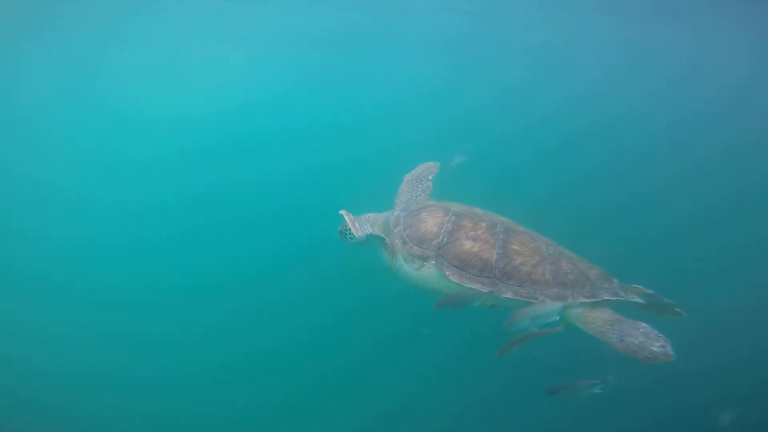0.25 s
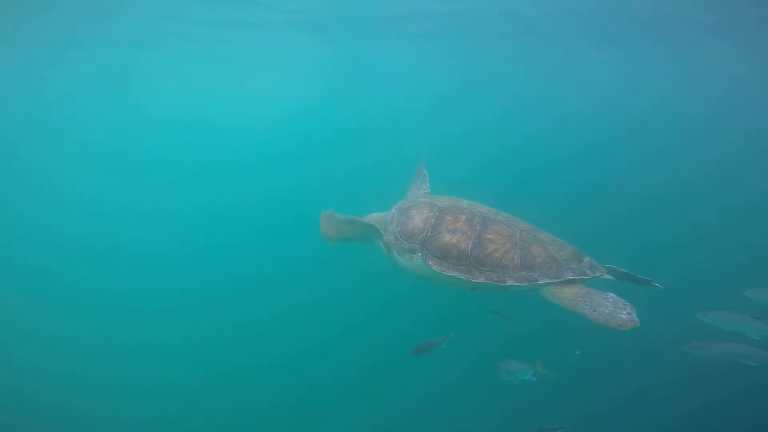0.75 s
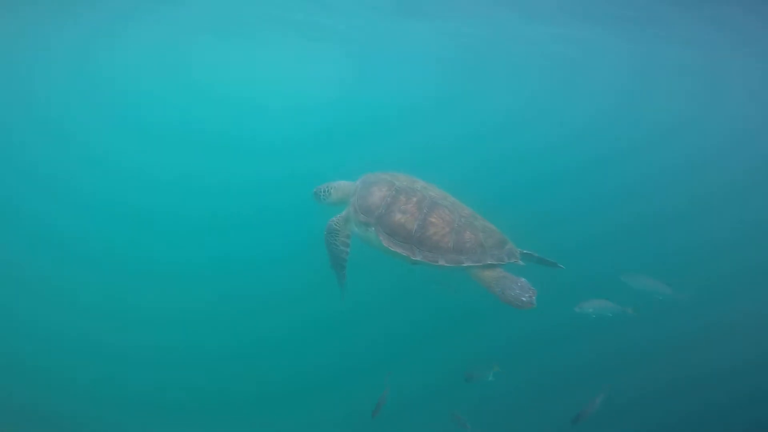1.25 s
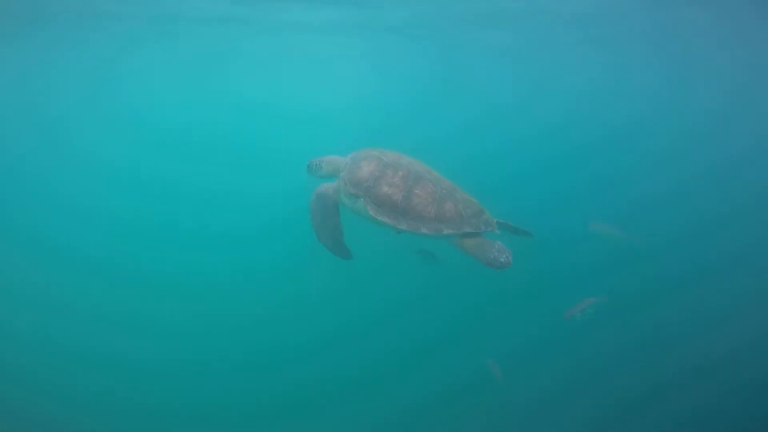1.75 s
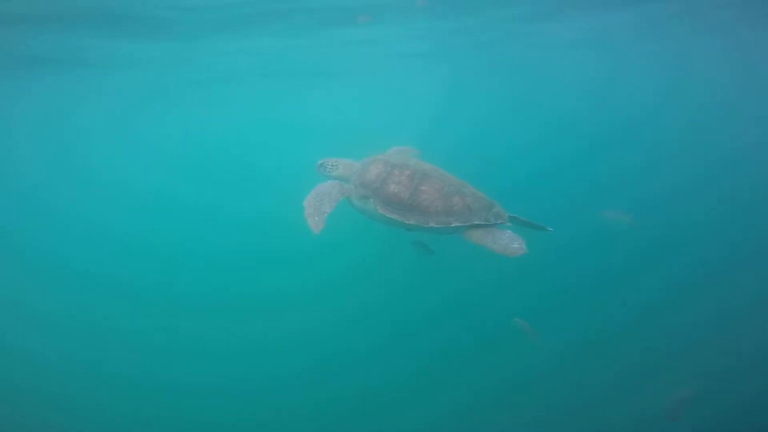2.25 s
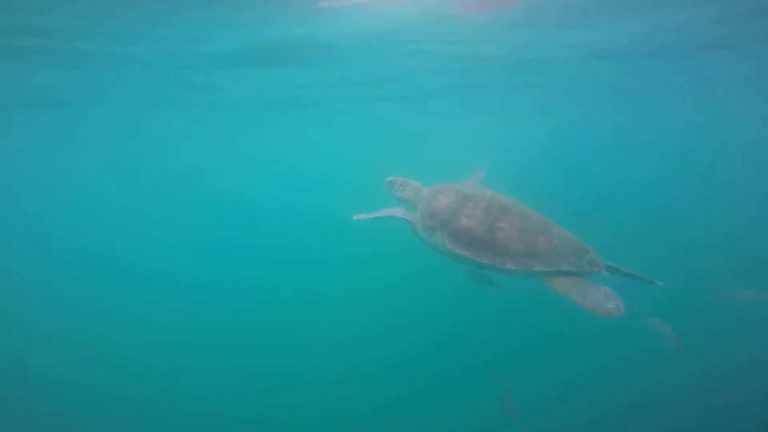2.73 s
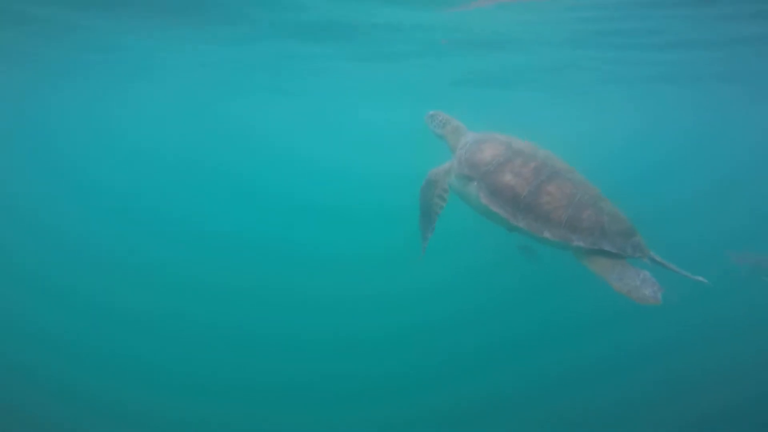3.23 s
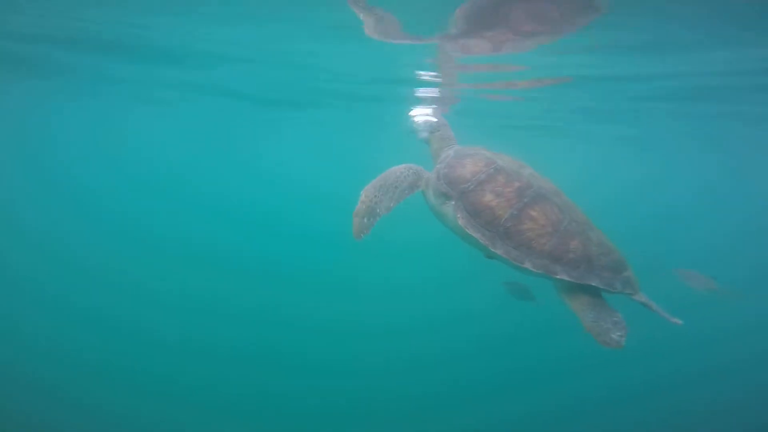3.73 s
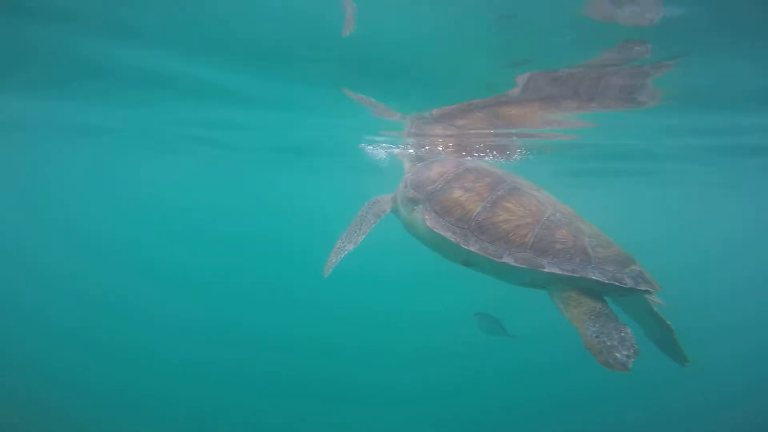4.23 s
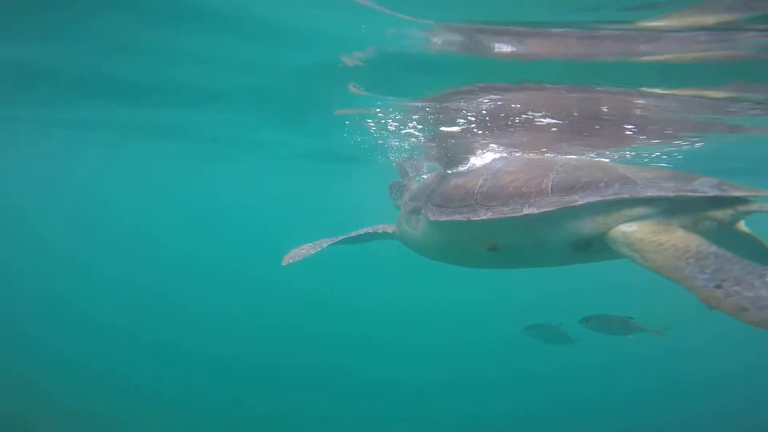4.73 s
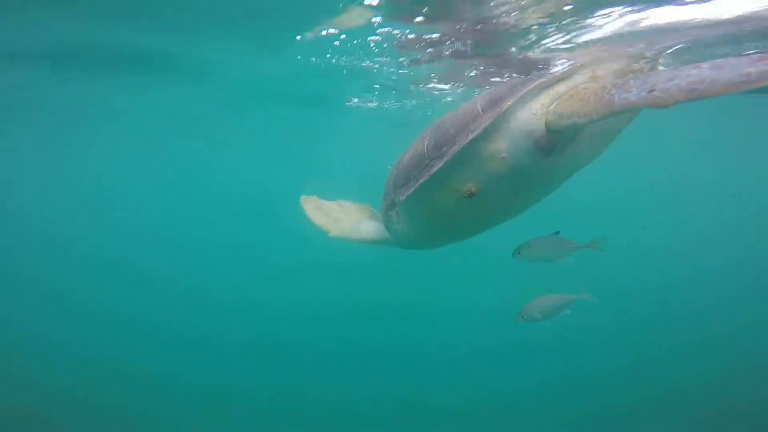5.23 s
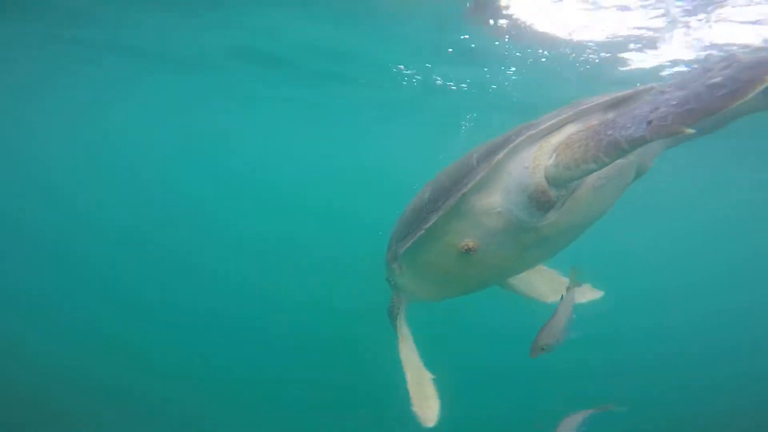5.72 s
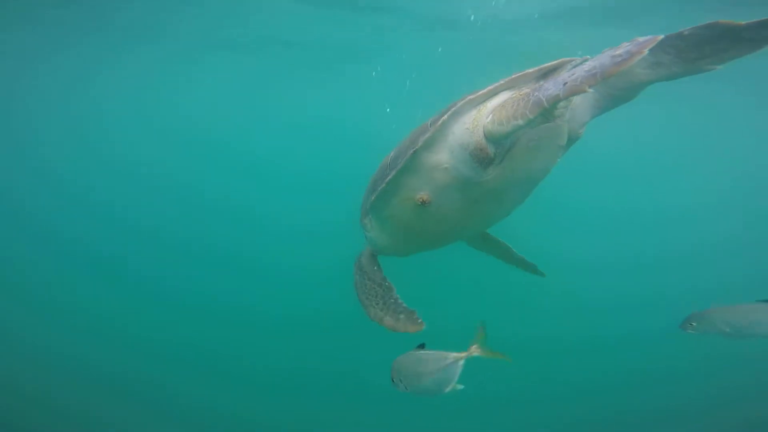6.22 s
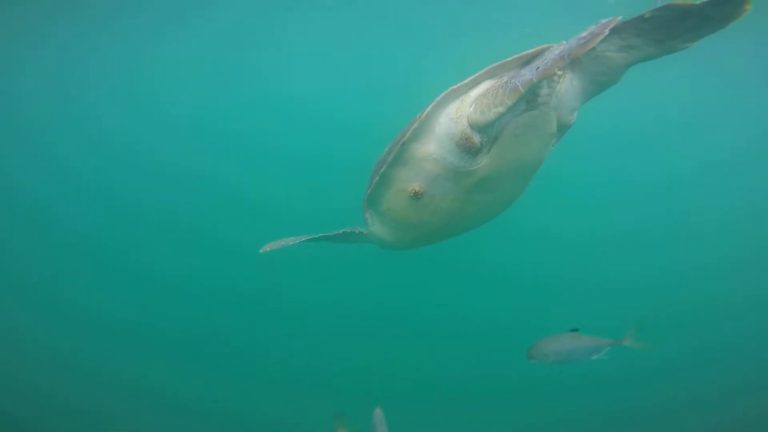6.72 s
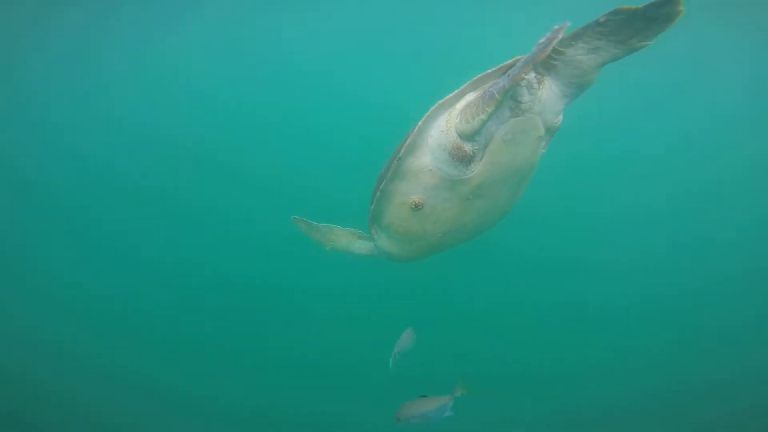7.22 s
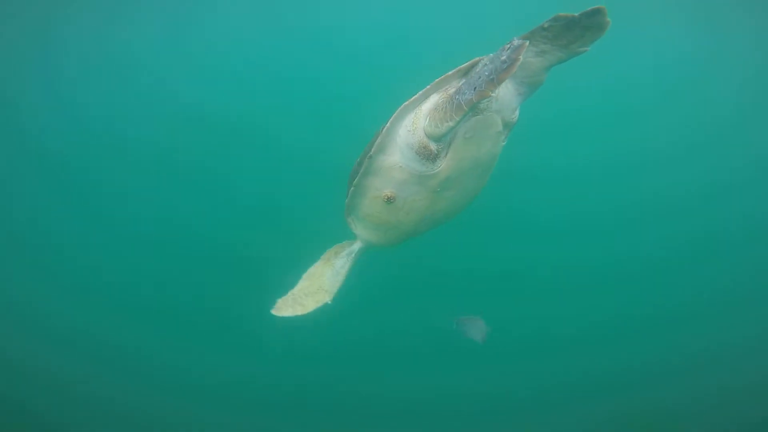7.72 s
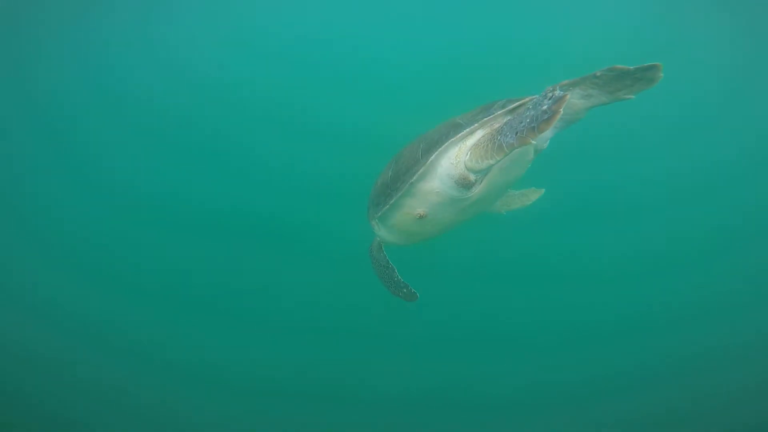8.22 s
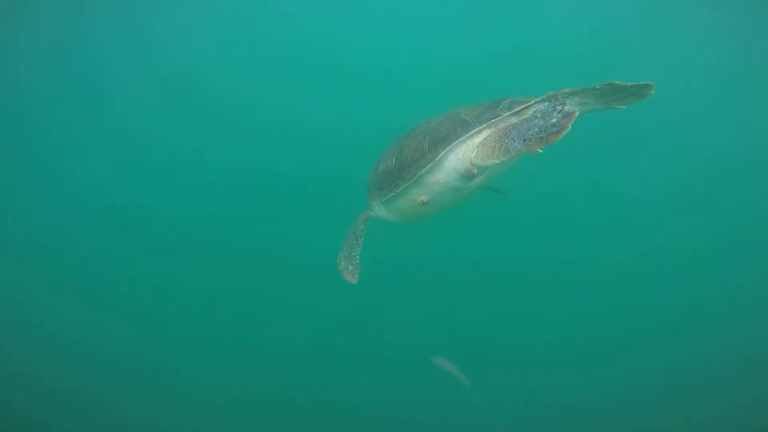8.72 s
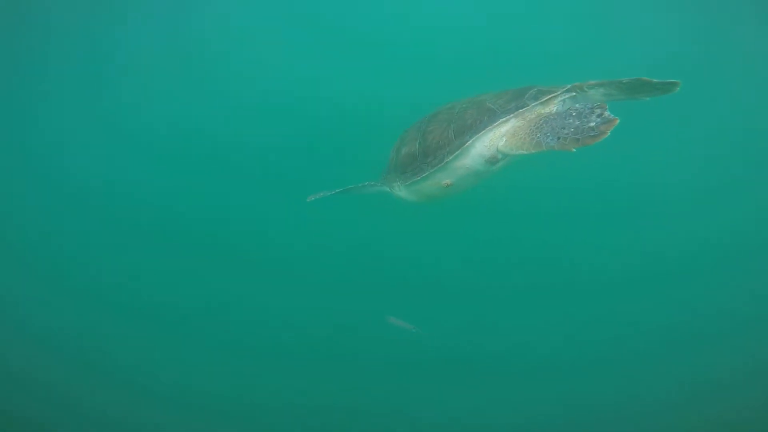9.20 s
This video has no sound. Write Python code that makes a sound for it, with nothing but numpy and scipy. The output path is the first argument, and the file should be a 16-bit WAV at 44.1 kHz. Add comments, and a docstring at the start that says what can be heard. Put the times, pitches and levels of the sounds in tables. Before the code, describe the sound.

A muffled engine drone pulses rapidly through open water, coloured by a faint mechanical whine. Tiny dry snaps and a hissy crackle surround it. Dull thumps, falling gulps and light slaps hit the microphone's housing, busiest around the middle near the surface. Afterward the throb becomes fuller and knockier, with small bubble plips and a last cluster of bumps. The swimming turtle is not heard.

```python
"""Open water just below the surface: an idling boat engine some way off gives a throbbing drone and a thin whine.
Its firings excite hull and machinery as bursts of noise, shaped by spectra that change as the microphone
drifts up to the surface and down again. Water and fingers bump the microphone's housing: falling gulps, slaps and
ringing modes. Eddies rumble past, a few bubbles plip as decaying sines, and shrimp snap as sharp noise pulses,
the near ones singly, the far ones merged into a crackle and a wash."""
import sys
import numpy as np
from scipy import signal
from scipy.fft import rfft, irfft, next_fast_len
from scipy.io import wavfile
from scipy.ndimage import uniform_filter1d, map_coordinates

SR = 44100
rng = np.random.default_rng(int(sys.argv[2]) if len(sys.argv) > 2 else 0)


def transcribe(signal):
    """Save signal, clipped to [-1, 1], as a 16-bit WAV file at the path in sys.argv[1]."""
    frames = np.atleast_2d(signal).T
    limited = np.clip(frames, -1, 1)
    pcm = np.round(limited * 32767).astype(np.int16)
    wavfile.write(sys.argv[1], SR, pcm)


N = 417181

# Path of the microphone: (time [s], place [0 open water, 1 at the surface, 2 on the dive])
DRIFT = [(0, 0.28), (.7, 0.00017), (2, 0.28), (2.6, 0.18), (3.5, 0.74), (4, 0.91), (5.5, 1.094),
         (6.05, 1.25), (6.45, 1.82), (9.46, 1.95)]

# Cylinder firings in one engine cycle: (phase [cycles], drone burst [dB], whine burst [dB])
FIRINGS = [(0.098, -4.5, 3), (0.372, -10.5, -4.5), (0.61, -0.5, 1.5), (0.86, -2, 2)]
IDLE_HZ, CREEP_HZ_PER_S = 14.585, .0048  # engine cycle rate at the start, and its rise
HUM_ORDER, HUM_LEVEL_DB = 24, -25  # multiple of the cycle rate; mean level against the drone
# Hull drone spectrum at each place, relative: (frequency [Hz], level [dB])
DRONE_OPEN = [(160, -19), (280, -19.5), (317, -17.5), (348, -14), (434, -8), (471, -16), (521, -2.5),
              (579, 3), (676, 4), (708, -5.5), (831, -2), (1010, -15), (1150, -20.5), (1500, -11),
              (2530, -120)]
DRONE_SURFACE = [(160, -21), (280, -32), (351, -18), (388, -16.5), (491, -16), (540, -12), (576, -8.5),
                 (626, 5), (730, -4), (850, -17), (935, -14.5), (1070, -22.5), (1150, -39), (1500, -67),
                 (2530, -120)]
DRONE_DIVE = [(160, -28.5), (280, -33.5), (340, -20), (376, -17), (414, -13), (559, -15), (615, -3.5),
              (680, 3.5), (792, -10), (876, -9.5), (941, -32.5), (1010, -17), (1100, -35.5), (1150, -24.5),
              (1500, -28.5), (2530, -120)]
# Machinery whine spectrum at each place, relative: (frequency [Hz], level [dB])
WHINE_OPEN = [(650, -37), (1100, -17), (1150, -14), (1290, -13), (1350, -5), (1530, -13), (1790, 0.5),
              (1980, -8.5), (2200, 3), (2420, -1), (2690, -5.5), (2910, 3), (3020, 2.5), (3180, -20),
              (3400, -13), (4420, -21.5), (7480, -120)]
WHINE_SURFACE = [(650, -49), (1100, -18), (1190, 1), (1470, -17), (1580, -14.5), (1830, -10), (2120, -0.5),
                 (2280, 2.5), (2390, 2), (2570, 1), (2830, -4), (2990, 1.5), (3040, -21), (3320, -15),
                 (3400, -16), (4420, -41), (7480, -120)]
WHINE_DIVE = [(650, -2.5), (1100, -38), (1210, 6.5), (1370, -20), (1550, 8), (1660, -8), (1760, 3),
              (2030, 4), (2180, 7), (2620, -1.5), (2720, -9), (2980, 3), (3400, -11.5), (4420, -18),
              (7480, -120)]
# Sliding of the spectral ridges, and a wandering notch (a boost where its gain is positive):
# (time [s], ridge frequency ratio [1], notch centre [Hz], notch gain [dB])
DRONE_RIDGES = [(0, 0.99, 760, -0.5), (5.5, 0.99, 700, -3), (6.5, 1.004, 726, -13.5),
                (7.4, 1.006, 766, -11), (9.46, 0.96, 756, 6.5)]
WHINE_RIDGES = [(0, 1.02, 1660, 3), (2, 0.97, 1550, -5.5), (3.3, 0.97, 1640, -13), (4.5, 0.975, 1790, -6),
                (5.5, 0.99, 1380, -3), (6.499, 0.98, 1530, -6), (7.5, 0.97, 1470, -6),
                (9.46, 1.037, 1360, -2)]
# Far source levels at the three places, before the surface loss and each layer's trim: one level [dB] per place
DRONE_DB = [-28, -25, -20]
WHINE_DB = [-28.5, -32, -32.5]
CRACKLE_DB = [-42.5, -44, -42.5]
# Just under the surface the mirror image cancels far sound: gain [dB], and width of that zone [places]
DRONE_SHADOW_DB, WHINE_SHADOW_DB, CRACKLE_SHADOW_DB, SHADOW_WIDTH = -5.5, -7, -5.5, 0.17

# Hard knocks in the drone, before the common trim: (time [s], level [dB])
KNOCKS = [(3.365, -12), (3.468, -14), (3.781, -7), (4.565, -16), (4.701, -19), (4.77, -12.5), (6.891, -4),
          (6.961, -8), (7.371, 0), (7.451, -9), (7.647, -6), (7.712, -1), (8.331, -8), (8.6, -3.5),
          (9.149, -6.5)]

# Bumps on the housing, before the common trims:
# (time [s], level [dB], deep push against it [dB], sharp slap against it [dB])
BUMPS = [(.975, -18.5, -4.5, -16), (1.728, -12, -11, -30), (2.288, -27, 4, -30), (2.568, -24, 0, -14),
         (2.974, -16, -15, -32), (3.13, -12.5, -10, -33), (3.291, -14, -11, -31), (3.54, -15, 0.5, -36),
         (3.557, -17.5, -4, -38), (3.665, -22, -4, -25), (3.71, -19.5, -3, -28.5), (3.776, -14, 0, -25),
         (3.817, -32, 12.5, -30), (3.912, -26, -1, -26), (4.081, -21, -7, -10), (4.128, -19, -8, -28),
         (4.166, -23, -2, -30), (4.27, -9, -4.5, -21.5), (4.712, -16.5, -6, -18), (5.15, -18.5, 0, -10),
         (5.255, -21, -3.5, -28), (5.431, -21, 2, -35), (6.198, -28, 7, -30), (6.667, -21, -0.5, -24),
         (6.723, -17.5, -16, -24), (7.074, -27, 5, -30), (7.115, -21.5, 1, -20), (7.167, -17.5, -3.5, -16),
         (7.204, -21, 1.5, -28), (7.481, -16.5, -9, -16), (8.944, -18.5, -2, -16), (9.024, -8.5, -7, -31),
         (9.24, -18, -9, -29), (9.314, -17, -10.5, -34)]
# Modes of the housing, before a small random detuning: (frequency [Hz], level [dB], decay time T60 [s])
HOUSING = [(214, -3, 0.064), (603, -9, 0.055)]
WAKE_DB, WAKE_S = -7, 0.09  # wake's level against the deep push, and time constant of its power

# Steady flow past the housing, before the wakes and the trim: (time [s], level [dB])
FLOW = [(0, -29.5), (.6, -30.5), (2.4, -24), (2.75, -20.5), (3.3, -24), (3.8, -17.5), (4.4, -22.5),
        (5, -24.5), (5.6, -26), (6.15, -21), (6.7, -26.5), (8.3, -31.5), (8.7, -27), (9.46, -29.5)]
# Relative spectrum of the flow rumble: (frequency [Hz], level [dB])
RUMBLE = [(10, -11.5), (19, 6), (31, 3), (50, -3.5), (78, -10), (105, -28.5), (155, -30.5), (215, -36.5),
          (290, -55), (700, -90)]

# Small bubbles: (time [s], level [dB], frequency [Hz])
BUBBLES = [(3.832, -29, 1970), (6.596, -15, 2097), (7.215, -18.5, 1820)]

# Nearest shrimp snaps, before the wall's colouring: (time [s], peak [dB], ring [Hz], bright crack setting [dB])
SNAPS = [(0.169, -21, 3800, -8), (0.3805, -15, 3170, -18), (1.3307, -21, 3530, -10),
         (1.3912, -18.5, 3200, -21), (1.5759, -19, 4300, -12), (1.797, -16.5, 3170, -15),
         (1.858, -18.5, 3230, -10), (1.9189, -26, 3620, -16), (2.2947, -19.5, 4300, -16),
         (2.7436, -17, 3400, -14), (2.835, -19.5, 5100, -15), (3.6475, -24.5, 5470, -5),
         (4.562, -25.0, 4300, -23), (4.5922, -15.5, 3100, -6), (4.6595, -18.5, 4130, -4),
         (4.862, -20.5, 5940, -2), (5.5451, -19, 5340, -6), (5.5799, -27, 9260, -2),
         (5.7667, -13.5, 3230, -7), (6.104, -24.5, 3880, -12), (6.2094, -16, 3280, -22),
         (6.2224, -27, 3360, -13), (6.2771, -20.5, 4140, -16), (6.4007, -18, 3170, -14),
         (6.4857, -22.5, 4350, -16), (6.5345, -17, 3070, -14), (6.5734, -18.0, 4200, -28),
         (6.7925, -23.5, 4440, -19), (6.879, -23, 4400, -32), (7.006, -23, 3830, -30),
         (8.049, -24, 4300, -15), (8.1126, -22, 4260, -13), (8.2636, -16.5, 3230, -21),
         (8.4087, -21, 3180, -31), (8.4875, -15, 3210, -17), (8.6091, -23.5, 4040, -27),
         (8.6273, -12, 3120, -21), (8.8068, -23, 4390, -16), (9.0898, -18, 3230, -17),
         (9.168, -14, 3820, -32), (9.2229, -24, 4180, -29)]
# Lesser snaps at random times: centre values, and the spread per unit of a draw from -1.45 to 1
LESSER_COUNT, LESSER_DB, LESSER_CRACK_DB = 70, -28.5, -17.5
LESSER_SPREAD_DB, LESSER_CRACK_SPREAD_DB = 2.5, 5
# Transmission of the housing wall for near snaps: (frequency [Hz], gain [dB])
WALL = [(3000, 5.5), (4100, -1), (4400, 8), (4850, -7), (5300, 7.5), (5700, -17), (6100, 4.5), (6800, -5),
        (8700, -1), (9400, 3), (11800, -8), (13400, -2), (15500, -5)]
# Families of distant snaps: (favoured frequency [Hz], strength of the preference [0-1])
SNAP_FAMILIES = [(3400, 1), (4400, 1), (5600, 1), (9000, 1), (8000, .4)]
# Relative spectrum of the distant shrimp: (frequency [Hz], level [dB])
FIZZ = [(1820, -30), (3100, -3), (3390, -11.5), (3750, -6), (4080, -10.5), (4420, -10), (4850, -16.5),
        (5290, -13), (5680, -16), (6100, -20), (6780, -25), (8600, -23.5), (9400, -24.5), (10000, -27),
        (11800, -31.5), (13400, -27), (15000, -27), (15800, -47)]

TOP_HZ = 15500  # upper band limit of the microphone


def engine(level_db=-0.78, ring_db=1.0):
    """Forced vibration: firings drive the low hull drone and the higher machinery whine, with one pure order."""
    drone_db = level_at_microphone(DRONE_DB, DRONE_SHADOW_DB)
    whine_db = level_at_microphone(WHINE_DB, WHINE_SHADOW_DB)
    thuds = firing_bursts(column=1, decay=.14, bed_db=-8, scatter_db=1, repeat=.12)
    rattle = firing_bursts(column=2, decay=.16, bed_db=-5, scatter_db=1, repeat=.04)
    rattle = seabed(rattle, echo_db=-11, t60=.12)

    drone_spectra = [DRONE_OPEN, DRONE_SURFACE, DRONE_DIVE]
    whine_spectra = [WHINE_OPEN, WHINE_SURFACE, WHINE_DIVE]
    drone = sliding_ridges(unit(thuds), drone_spectra, DRONE_RIDGES, notch_width_hz=24.5, patchy_db=1.08)
    whine = sliding_ridges(rattle, whine_spectra, WHINE_RIDGES, notch_width_hz=110, patchy_db=2.0)

    hum_phase = 2 * np.pi * HUM_ORDER * cycles() + 0.94 * wobble(4)
    hum = amp(HUM_LEVEL_DB + 3 * wobble(3)) * unit(np.sin(hum_phase))
    drone_gain = amp(drone_db + level_db + 0.22 * wobble(6))
    whine_gain = amp(whine_db + ring_db + 0.43 * wobble(8.3))
    return drone_gain * (drone + hum) + whine_gain * whine


def cycles():
    """Phase is the integral of rate: engine cycles completed at each sample."""
    t = np.arange(N) / SR
    return IDLE_HZ * t + CREEP_HZ_PER_S * t ** 2 / 2


def firing_bursts(column, decay, bed_db, scatter_db, repeat):
    """Periodic excitation: each firing adds a noise burst decaying over `decay` cycles; a share repeats each cycle."""
    turn = cycles()
    power = np.full(N, amp(bed_db) ** 2)
    for row in FIRINGS:
        since = turn - row[0] + 1
        size = amp(row[column] + scatter_db * rng.standard_normal(int(turn[-1]) + 3))
        power += (size[since.astype(int)] * np.exp(-(since % 1) / decay)) ** 2
    period = int(N / turn[-1])
    one_cycle = rng.standard_normal(period)
    same = one_cycle[(turn % 1 * period).astype(int)]
    share = np.clip(repeat, 0, 1)  # by power
    return np.sqrt(power) * (np.sqrt(share) * same + np.sqrt(1 - share) * rng.standard_normal(N))


def seabed(x, echo_db, t60):
    """Multipath interference: many faint late paths comb the sound into fine fixed ridges."""
    t = np.arange(SR // 6) / SR
    tail = rng.standard_normal(len(t)) * amp(-60 * t / t60)
    echoes = signal.fftconvolve(x, tail / np.linalg.norm(tail))[:N]
    return unit(x + amp(echo_db) * echoes)


def sliding_ridges(x, spectra, ridges, notch_width_hz, patchy_db):
    """Position-dependent transmission: spectra blend by place, ridges slide, a notch wanders, patches swell."""
    hz, t, z = signal.stft(x, SR, nperseg=2048)
    at_frames = np.minimum((t * SR).astype(int), N - 1)
    place, ratio, notch_hz, notch_db = (c[at_frames] for c in curves(DRIFT) + curves(ridges))
    gain = 0
    for k, spectrum in enumerate(spectra):
        f, db = np.transpose(spectrum)
        colour = amp(np.interp(np.log(hz[:, None] / ratio + 1), np.log(f + 1), db))
        weight = np.clip(1 - np.abs(np.clip(place, 0, 2) - k), 0, 1)
        gain = gain + weight * unit(colour)
    notch = notch_db * np.exp(-((hz[:, None] - notch_hz) / notch_width_hz) ** 2)
    # noise smoothed over 4 bins and 24 frames
    over_hz = uniform_filter1d(rng.standard_normal(z.shape), 4, axis=0)
    patches = unit(uniform_filter1d(over_hz, 24, axis=1))
    return signal.istft(z * gain * amp(notch + patchy_db * patches), SR, nperseg=2048)[1][:N]


def level_at_microphone(places_db, shadow_db):
    """Surface-image interference: a far source's level (dB) follows place and sinks near the surface."""
    place, = curves(DRIFT)
    shadow = np.exp(-((place - 1) / SHADOW_WIDTH) ** 2)
    return np.interp(place, np.arange(len(places_db)), places_db) + shadow_db * shadow


def knocks(ring_hz=660, swell=0.005, level_db=-6.0):
    """Transient resonance: at listed hard firings the hull's main resonance swells (rise time in s) and dies."""
    out, t = np.zeros(N), np.arange(SR // 16) / SR
    shape = (t / swell * np.exp(1 - t / swell)) ** 2
    for (s, db), detune in zip(KNOCKS, rng.standard_normal(len(KNOCKS))):
        hz = ring_hz * (1 + 0.0048 * detune)
        add(out, s, amp(db + level_db) * shape * np.sin(2 * np.pi * hz * t))
    return out


def bumps(start_hz=430, slide=0.00319, t60=0.13, heave_t60=0.38, level_db=3, deep_db=-1, contact_db=6):
    """Impact on a shell: a short slap and a falling gulp, with the housing's modes and a ragged tail."""
    out, t = np.zeros(N), np.arange(SR // 4) / SR
    stir_spectrum = [(40, -12), (80, 0), (150, -7), (240, 1), (480, -14), (1500, -40)]  # (Hz, dB)
    for (s, db, push_db, slap_db), vary in zip(BUMPS, rng.standard_normal((len(BUMPS), 2))):
        # a broad, deep push starts lower than a sharp one
        hz = start_hz * np.exp(0.13 * vary[0] - 0.02 * push_db)
        push = gulp(hz, slide * np.exp(0.084 * vary[1]), amp(push_db + deep_db), t60, heave_t60)
        ring = np.zeros(len(t))
        for mode_hz, mode_db, life in HOUSING:
            detuned_hz = mode_hz * np.exp(0.028 * vary[1])
            ring += amp(mode_db - 60 * t / life) * np.sin(2 * np.pi * detuned_hz * t)
        # the stirred water
        stir = unit(coloured(rng.standard_normal(len(t)), stir_spectrum))
        tail = amp(-14 - 60 * t / .14) * stir
        onset = 1 - np.exp(-t / 0.016)
        add(out, s + 0.00314, amp(db + level_db) * (push + (ring + tail) * onset))
        # the slap slides down from its first bright edge
        slap_hz = 380 + 1800 * np.exp(-t / .002)
        slap_shape = (t / .0025) * np.exp(1 - t / .0025)
        slap = np.sin(2 * np.pi * np.cumsum(slap_hz) / SR) * slap_shape
        add(out, s + 0.00091, amp(db + slap_db + contact_db) * slap)
    return out


def gulp(start_hz, slide, deep_gain, t60, heave_t60):
    """Displacement flow: a push of water whose swings lengthen as its pitch falls, leaving a slow heave."""
    t = np.arange(SR // 4) / SR
    pitch = 22 + start_hz / (1 + t / slide) ** 1.32
    heave = deep_gain * amp(-60 * t / heave_t60) * (1 - np.exp(-t / 0.013))
    size = amp(-60 * t / t60) + heave
    return size * (1 - np.exp(-t / 0.0049)) * np.sin(2 * np.pi * np.cumsum(pitch) / SR)


def flow(lumpy_db=2.0, level_db=-1.0):
    """Turbulent pressure: eddies give a lumpy rumble and an uneven 33 Hz rocking, with faint gulps in it."""
    flow_db = flow_level()
    rumble = unit(coloured(amp(lumpy_db * wobble(22)) * rng.standard_normal(N), RUMBLE))
    roll = amp(-7) * unit(np.sin(2 * np.pi * 33 * np.arange(N) / SR + 1.6 * wobble(13)))
    gurgle = np.zeros(N)
    for when, pitch, size in rng.random((150, 3)):
        drop = gulp(60 + 240 * pitch, slide=.004, deep_gain=.1, t60=.08, heave_t60=.15)
        add(gurgle, when * N / SR, amp(5.8 * size) * drop)
    # the stronger the flow, the larger the share of gurgling
    gurgle_db = -17 + .3 * (flow_db - np.mean(flow_db))
    return amp(flow_db + level_db) * (rumble + roll + amp(gurgle_db) * unit(gurgle))


def flow_level():
    """Addition of powers: flow level (dB) from the steady flow plus the decaying wake of every bump."""
    t = np.arange(N) / SR
    power = amp(curves(FLOW)[0]) ** 2
    for s, db, push_db, _ in BUMPS:
        calming = (t > s) * np.exp(-np.abs(t - s) / WAKE_S)
        power += amp(db + push_db + WAKE_DB) ** 2 * calming
    return 10 * np.log10(power)


def bubbles():
    """Damped bubble oscillation: each breaks off with a plip, and four quieter ones follow within 18 ms."""
    out = np.zeros(N)
    for s, db, hz in BUBBLES:
        add(out, s, amp(db) * plip(hz))
        for delay, pitch in rng.random((4, 2)):
            add(out, s + .018 * delay, amp(db - 7) * plip(hz * (.87 + .35 * pitch)))
    return out


def plip(hz, t60=0.041):
    """Free oscillator: a sine with a fast onset and exponential decay."""
    t = np.arange(SR // 20) / SR
    return amp(-60 * t / t60) * (1 - np.exp(-t / 0.0012)) * np.sin(2 * np.pi * hz * t)


def near_shrimp(lesser_hz=4400, t60=0.012, echo_db=-17):
    """Cavitation at close range: the nearest snaps and random lesser ones, each ringing at its own pitch."""
    out = np.zeros(N)
    shadow_db = level_at_microphone(np.zeros(len(CRACKLE_DB)), CRACKLE_SHADOW_DB)
    for s, db, ring_hz, crack_db in SNAPS:
        add(out, s, amp(db) * snap(ring_hz, crack_db, t60, echo_db))
    draws = rng.uniform(-1.45, 1, (LESSER_COUNT, 3))
    for when, (size, edge, detune) in zip(rng.random(LESSER_COUNT), draws):
        crack_db = LESSER_CRACK_DB + LESSER_CRACK_SPREAD_DB * edge
        sound = snap(lesser_hz * np.exp(0.62 * detune), crack_db, t60, echo_db)
        peak_db = LESSER_DB + LESSER_SPREAD_DB * size + shadow_db[int(when * N)]
        add(out, when * N / SR, amp(peak_db) * sound)
    return coloured(out, WALL)


def snap(ring_hz, crack_db, t60, echo_db):
    """Bubble collapse: one sharp pulse with a brief ring and its scatter off the surface; peak 1."""
    t = np.arange(SR // 20) / SR
    burst = rng.standard_normal(len(t)) * (amp(-60 * t / t60) + amp(echo_db - 60 * t / 0.2))
    burst[0] += 6  # the sharp pulse
    ring = [(600, -35), (ring_hz * .7, -9), (ring_hz, 0), (ring_hz * 1.25, -8)]
    crack = [(9500, crack_db - 3.0), (16000, crack_db - 8.5)]
    sound = coloured(burst, ring + crack)
    return sound / np.max(np.abs(sound))


def far_shrimp(snaps_db=-1.5, wash_db=-2):
    """Incoherent summation: distant snaps of many sizes and colours; the farthest merge into a wash."""
    crackle_db = level_at_microphone(CRACKLE_DB, CRACKLE_SHADOW_DB)
    families = sum(crackle(hz, focus) for hz, focus in SNAP_FAMILIES)
    snaps = unit(coloured(families, FIZZ))
    # distance takes the top off the wash
    distance = [(4000, 8.5), (8000, 6.0), (15000, -0.5)]  # (Hz, dB)
    wash = unit(coloured(coloured(rng.standard_normal(N), FIZZ), distance))
    # the sharper snaps vary only half as much (in dB) with place
    snap_db = (crackle_db + np.mean(crackle_db)) / 2 + snaps_db
    return amp(snap_db) * snaps + amp(crackle_db + wash_db) * wash


def crackle(favoured_hz, focus):
    """Random impulse process: about 70 snaps a second, each a pulse, a short ring and a weaker, longer scatter."""
    size = amp(7 * np.minimum(rng.standard_normal(N), 1.9))
    hits = (rng.random(N) < 70 / SR) * size
    t = np.arange(SR // 15) / SR
    shape = amp(-13 - 60 * t / .008) + amp(-26 - 60 * t / .07)
    power = np.abs(signal.fftconvolve(hits ** 2, shape ** 2)[:N])
    band = [(favoured_hz / 2, -18 * focus), (favoured_hz, 0), (favoured_hz * 2, -18 * focus)]
    return coloured(unit(hits + np.sqrt(power) * rng.standard_normal(N)), band)


def amp(db):
    """Level to amplitude ratio: 20 dB is a factor of ten."""
    return 10 ** (np.asarray(db) / 20)


def unit(x):
    """Normalisation to an rms value of 1."""
    return x / np.sqrt(np.mean(x ** 2) + 1e-20)


def curves(rows):
    """Linear interpolation: one value per sample for each column after the time."""
    s, *cols = np.transpose(rows)
    return [np.interp(np.arange(N) / SR, s, c) for c in cols]


def wobble(rate):
    """Band-limited fluctuation: a smooth random curve with `rate` knots a second."""
    knots = rng.standard_normal(int(N * rate / SR) + 4)
    return map_coordinates(knots, [np.arange(N) * rate / SR])


def coloured(x, spectrum):
    """Minimum-phase filtering: x through the causal filter with these (Hz, dB) points."""
    size = 2 * next_fast_len(len(x) // 2 + 4096)
    hz, db = np.transpose(spectrum)
    gain = amp(np.interp(np.log(np.fft.rfftfreq(size, 1 / SR) + 1), np.log(hz + 1), db))
    # folding the cepstrum onto positive times makes the filter causal
    cepstrum = irfft(np.log(np.maximum(gain, 1e-6)))
    cepstrum[1:size // 2] *= 2
    cepstrum[size // 2 + 1:] = 0
    return irfft(rfft(x, size) * np.exp(rfft(cepstrum)))[:len(x)]


def add(track, s, sound):
    """Linear superposition: mix a sound into the track at time s."""
    part = track[max(round(s * SR), 0):][:len(sound)]
    part += sound[:len(part)]


def scene():
    """Superposition of pressures: everything reaches one microphone inside the housing."""
    return (engine() + knocks() + bumps() + flow() + bubbles() + near_shrimp() + far_shrimp())[None]


def record(dry, hiss_db=-63):
    """Self-noise and bandwidth: the microphone adds faint hiss and passes nothing above its band limit."""
    size = next_fast_len(N + SR // 2)
    heard = dry + amp(hiss_db) * rng.standard_normal(dry.shape)
    passed = np.fft.rfftfreq(size, 1 / SR) < TOP_HZ
    return irfft(rfft(heard, size) * passed, size)[:, :N]


dry = scene()
out = record(dry)
transcribe(out)
```